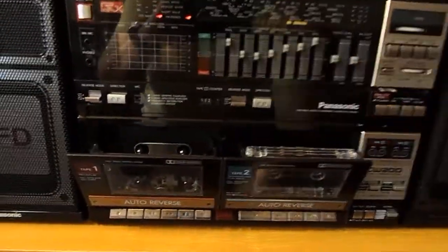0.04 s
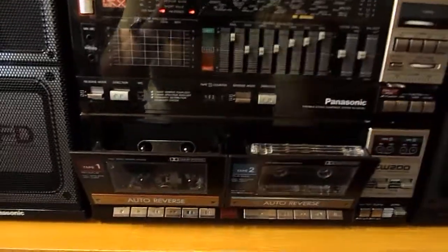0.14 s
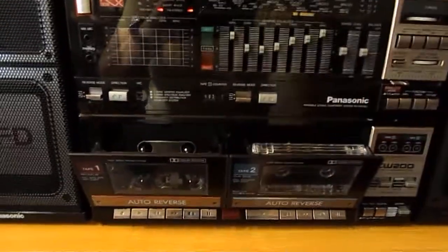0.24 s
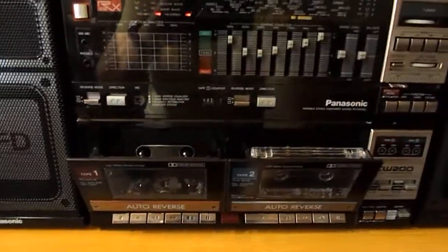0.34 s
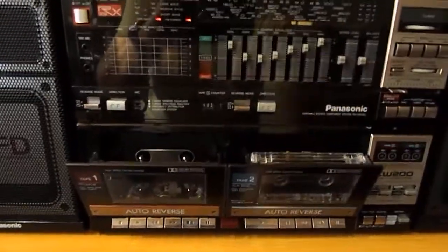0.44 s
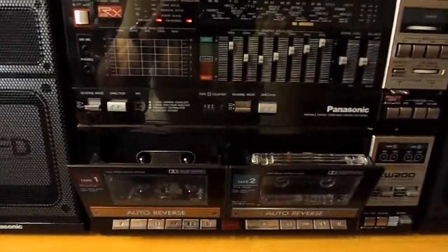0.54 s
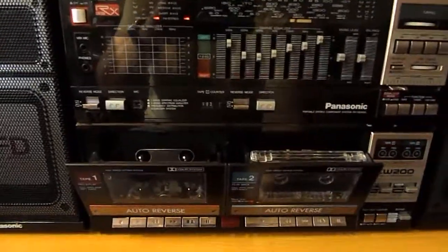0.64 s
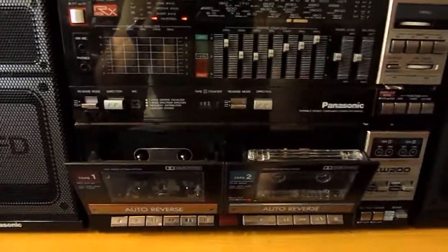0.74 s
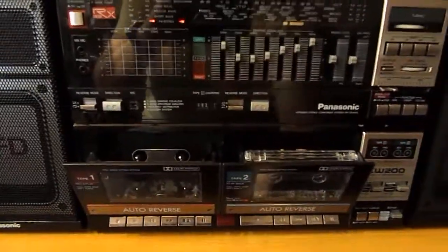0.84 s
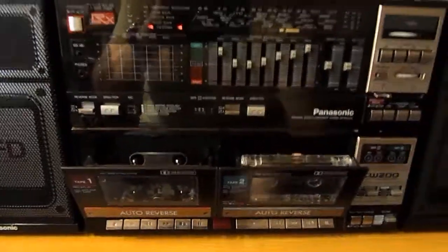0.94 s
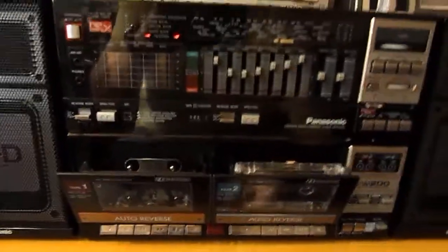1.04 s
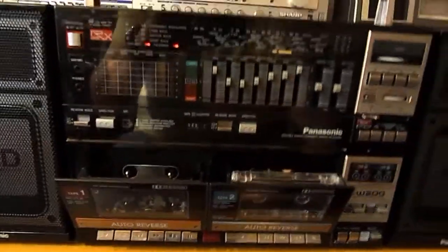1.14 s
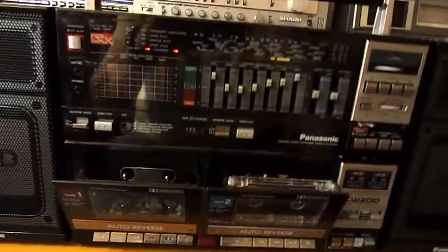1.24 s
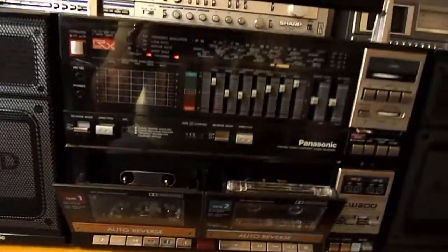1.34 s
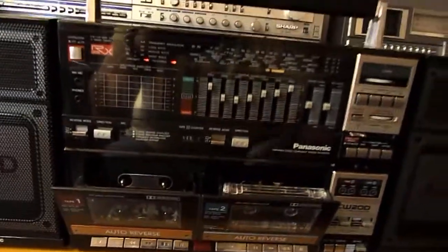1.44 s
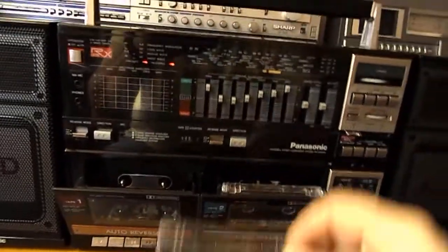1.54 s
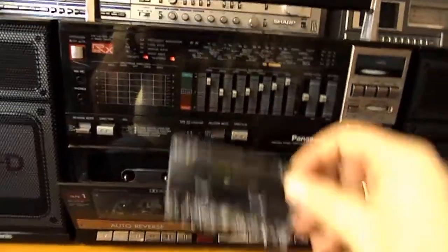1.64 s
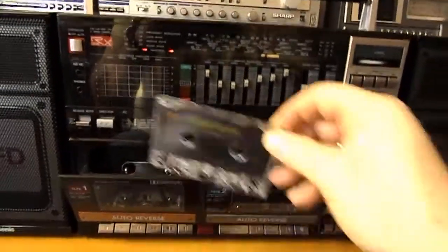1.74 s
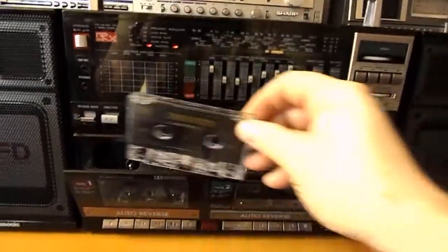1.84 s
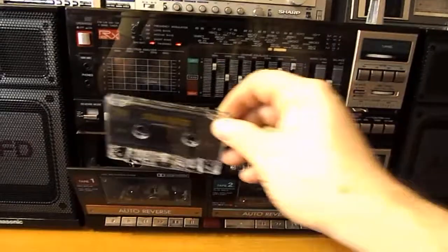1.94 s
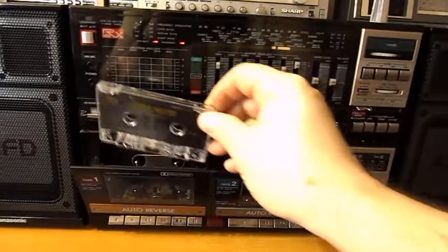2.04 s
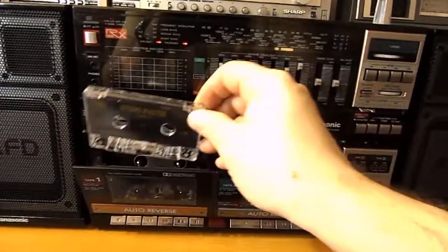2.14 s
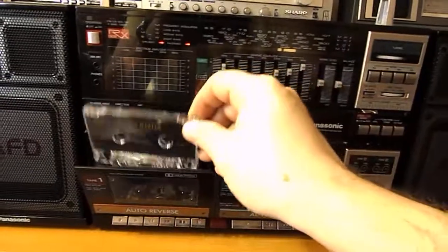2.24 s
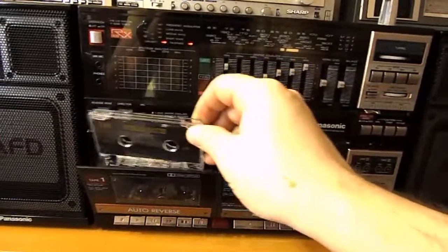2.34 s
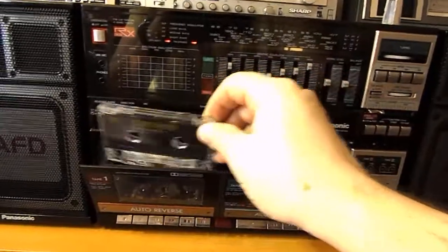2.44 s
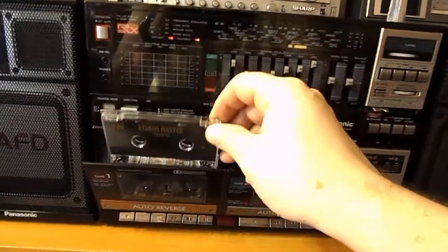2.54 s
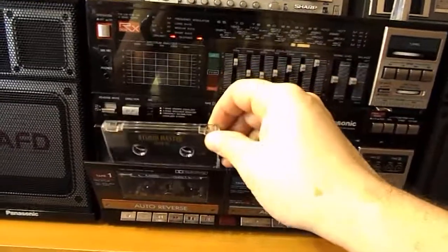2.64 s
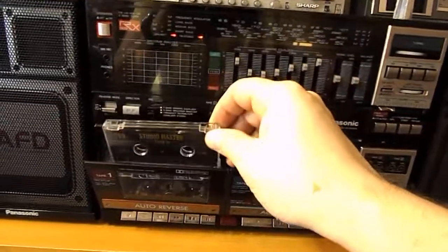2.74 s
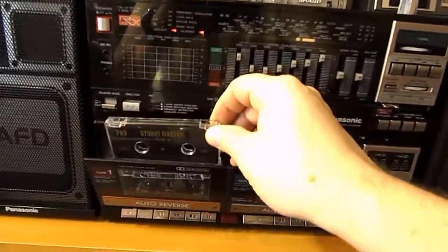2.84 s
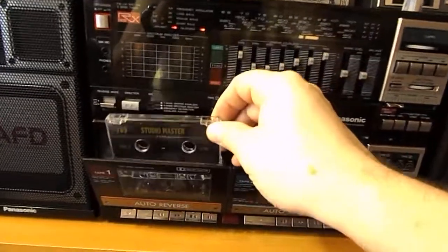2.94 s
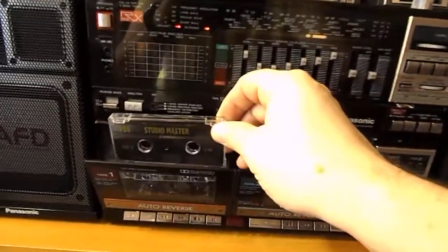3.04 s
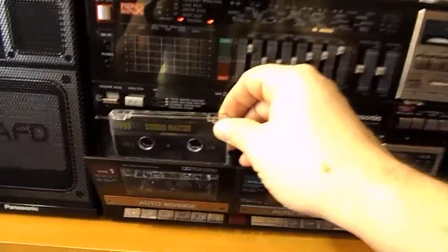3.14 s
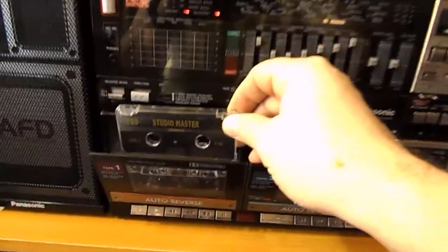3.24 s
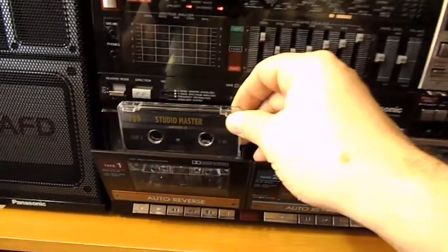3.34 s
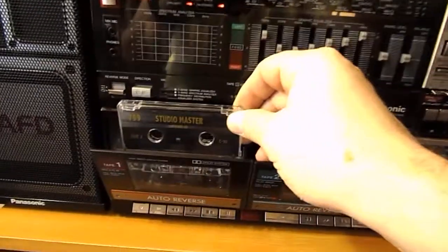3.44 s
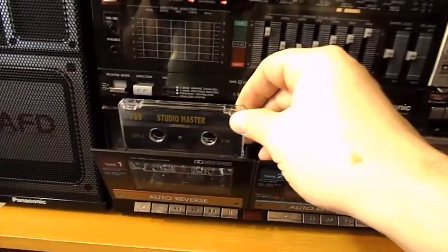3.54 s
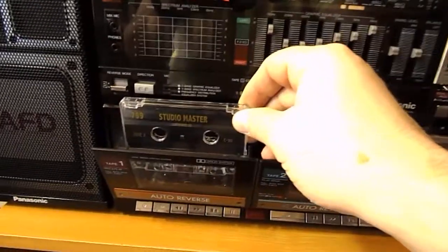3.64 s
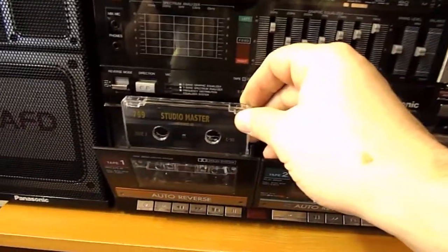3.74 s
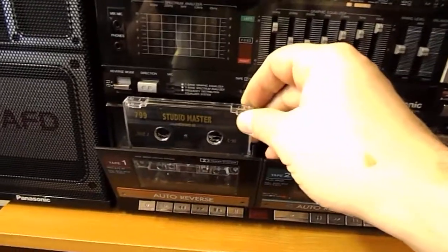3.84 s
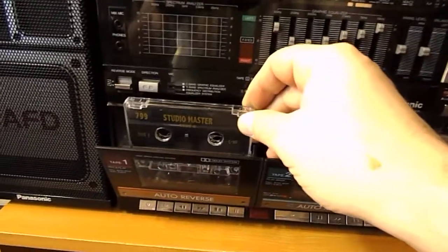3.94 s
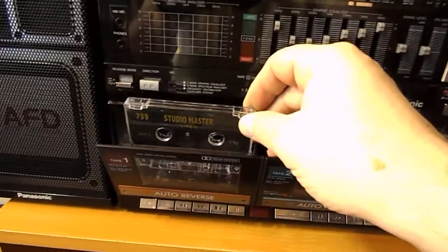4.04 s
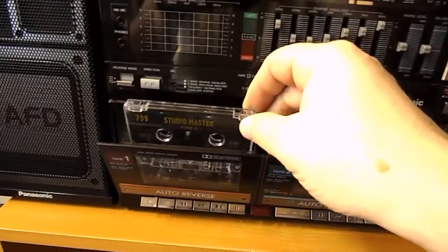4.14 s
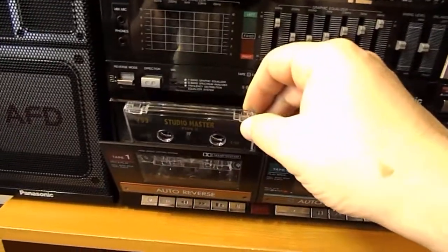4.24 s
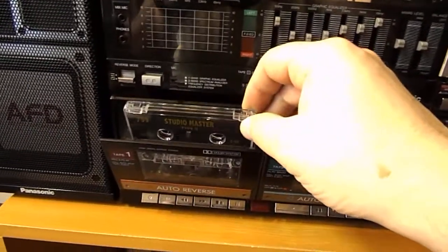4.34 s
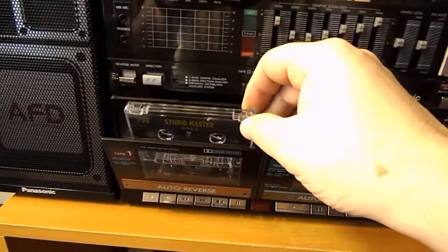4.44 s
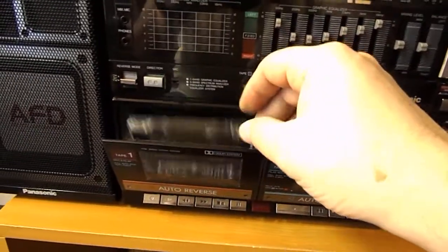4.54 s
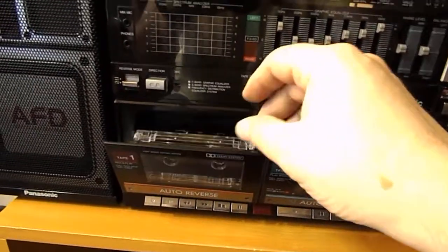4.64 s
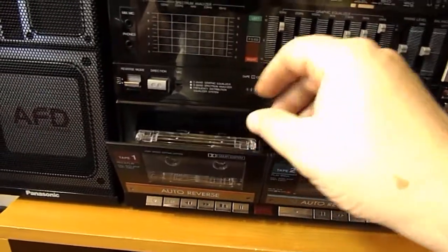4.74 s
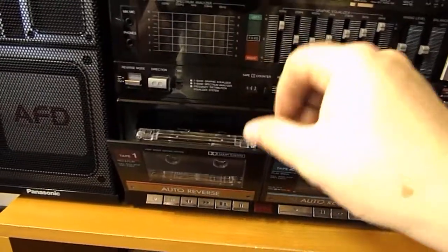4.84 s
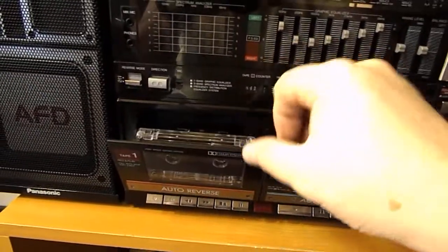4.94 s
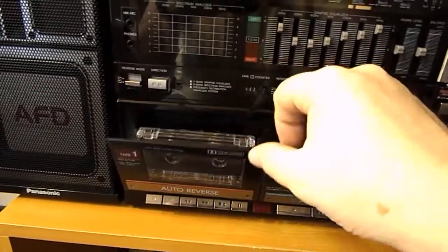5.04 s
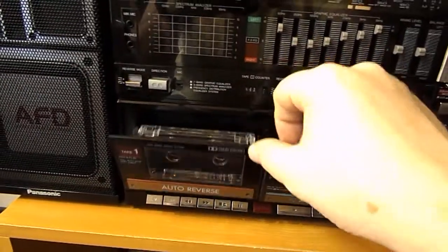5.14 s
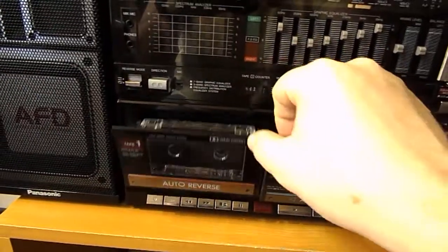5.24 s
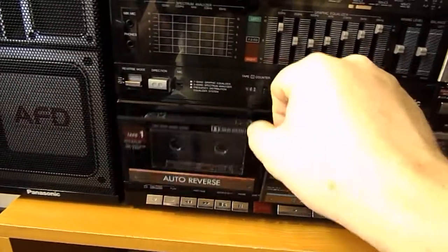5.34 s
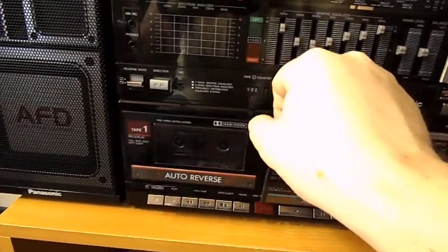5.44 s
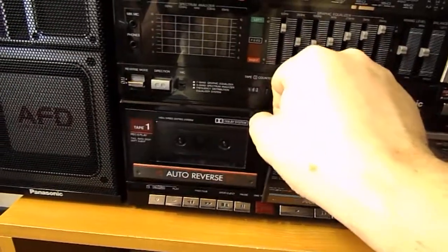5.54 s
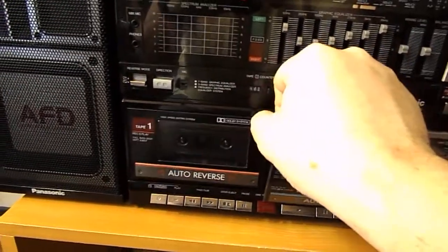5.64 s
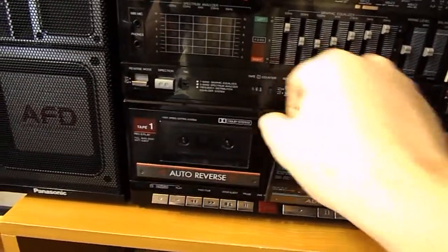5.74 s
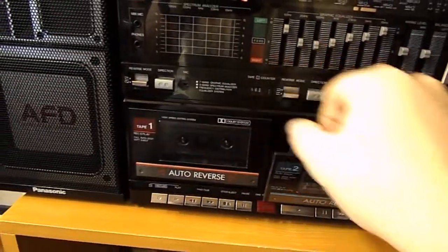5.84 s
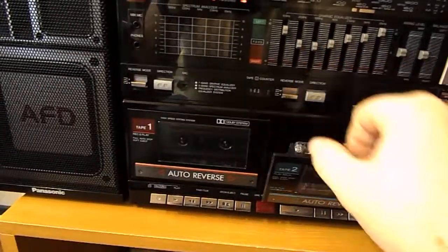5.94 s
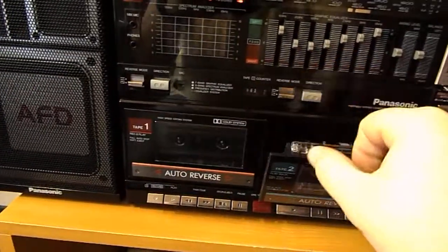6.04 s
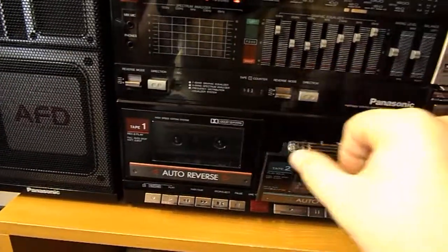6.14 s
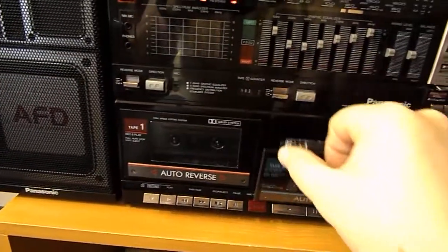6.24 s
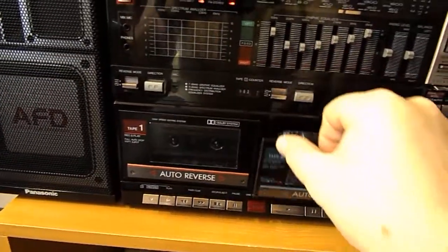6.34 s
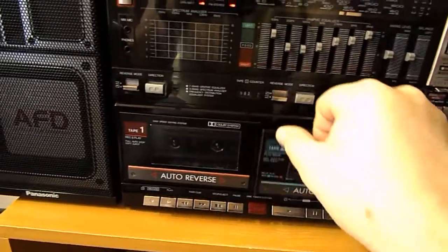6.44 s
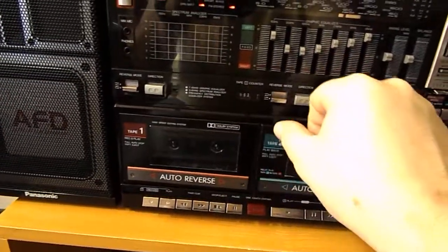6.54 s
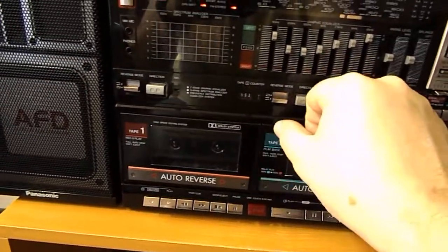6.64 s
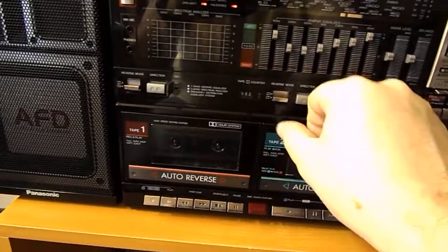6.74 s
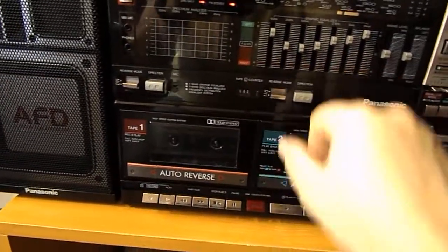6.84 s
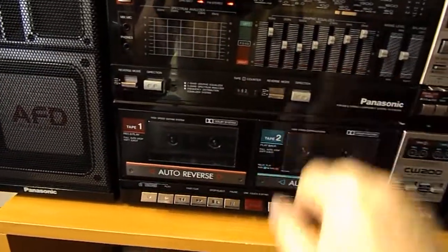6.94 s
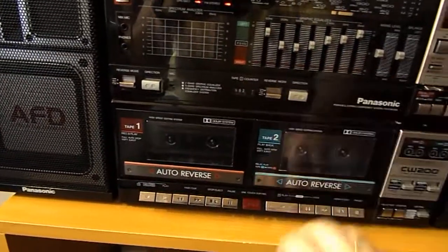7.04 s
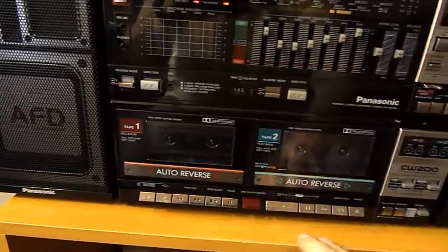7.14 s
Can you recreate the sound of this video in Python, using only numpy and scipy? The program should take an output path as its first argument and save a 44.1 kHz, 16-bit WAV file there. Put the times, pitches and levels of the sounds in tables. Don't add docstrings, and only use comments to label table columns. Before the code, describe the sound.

Plastic cassette doors clack open and snap shut on a portable stereo, with close cassette clicks, small rattles and faint hiss in a small room.

```python
import sys
import numpy as np
from scipy import signal
from scipy.fft import rfft, irfft, next_fast_len
from scipy.io import wavfile
from scipy.ndimage import uniform_filter1d

SR = 44100
rng = np.random.default_rng(int(sys.argv[2]) if len(sys.argv) > 2 else 0)


def digitize_waveform(pressure):
    field = np.atleast_2d(pressure).T
    bounded = np.clip(field, -1, 1)
    quanta = np.round(bounded * 32767).astype(np.int16)
    wavfile.write(sys.argv[1], SR, quanta)


def volts(x):
    e = np.asarray(x, float) / 20
    return 10 ** e


N = 316638
TIME_S = np.arange(N) / SR
RING_S = np.arange(4400) / SR
LEFT_RIGHT = np.array([[1], [-1]])
SCATTER_DB = 2.5
WALL_BLUR, TOP_HZ = 6, 16500


def band(x, lo_hz, hi_hz):
    return signal.sosfilt(signal.butter(2, [lo_hz, hi_hz], "bandpass", fs=SR, output="sos"), x)


def highpass(x, order, hz):
    return signal.sosfilt(signal.butter(order, hz, "highpass", fs=SR, output="sos"), x)


def unit(x):
    return x / np.sqrt(np.mean(x ** 2))


def on_log(table, hz):
    table = np.array(table)
    return np.interp(np.log(hz), np.log(table[:, 0]), table[:, 1])


def add(out, start_s, sound):
    i = int(start_s * SR)
    out[..., i:i + sound.shape[-1]] += sound[..., :N - i]


# freq_hz, density_db_per_hz
HISS = [(70, -37.5), (156, -15.5), (304, -4.5), (484, -5), (565, -8), (1200, -10), (2930, -15.5),
        (16200, -23.5)]
# freq_hz, balance_db
HISS_BALANCE = [(200, 0), (700, 1.5), (1300, 3), (4400, 4), (15000, 2)]
# centre_hz, width_hz, level_db
HUM = [(490.4, 23, -66.5), (1060, 40, -73.5), (1260, 8.1, -75)]
HISS_DB = -54
WHINE_HZ, WHINE_DB = 11719, -77


def background():
    size = next_fast_len(N)
    hz = np.maximum(np.arange(size // 2 + 1) * SR / size, 1)
    lean_db = on_log(HISS_BALANCE, hz) / 2
    colour_db = on_log(HISS, hz) + LEFT_RIGHT * lean_db
    hiss = irfft(rfft(rng.standard_normal((2, size))) * volts(colour_db), size)[:, :N]
    waver = uniform_filter1d(rng.standard_normal(N), size=6000)
    out = unit(hiss) * volts(HISS_DB - 0.5 + 0.5 * unit(waver))
    for centre_hz, width_hz, level_db in HUM:
        noise = rng.standard_normal((2, N))
        mid, side = band(noise, centre_hz - width_hz / 2, centre_hz + width_hz / 2)
        out = out + volts(level_db) * (unit(mid) + 0.6 * unit(side) * LEFT_RIGHT)
    return out + volts(WHINE_DB + 4) * np.sin(2 * np.pi * WHINE_HZ * TIME_S)


# centre_hz, t60_s, level_db
ROOM = [(250, 0.39, -5.5), (500, 0.28, -8), (1000, 0.27, -16.5), (2000, 0.33, -20), (3740, 0.35, -22),
        (8000, 0.26, -20), (13090, 0.23, -22.5)]


def room(dry):
    t = TIME_S[:SR // 2]
    echo = 0
    for hz, t60_s, level_db in ROOM:
        mid, side = band(rng.standard_normal((2, len(t))), hz / 1.365, hz * 1.426)
        pair = mid + min(hz / 1300, 1) * side * LEFT_RIGHT
        echo = echo + volts(level_db - 60 * t / t60_s) * pair
    echo = echo * (1 - np.exp(-t / 0.0013)) * volts(-30 + 1.5 * LEFT_RIGHT)
    return signal.fftconvolve(dry, echo, axes=1)[:, :N]


# freq_hz, share_of_left_lean
SHADOW = [(300, 0.21), (700, .2), (1300, 0.4), (2400, 0.4), (4400, 1), (8000, 0), (15000, 0.61)]


def ring(modes, port_s, pan_db):
    hz, db, t60_s = np.transpose(modes)[:, :, None]
    t = RING_S[:int(t60_s.max() * SR)]
    chance = rng.standard_normal((4, len(modes), 1))
    phase = 2 * np.pi * hz * t + chance[3]
    size = volts(db + SCATTER_DB * chance[0] - 60 * t / t60_s)
    left = size * np.sin(phase)
    shade = volts(SCATTER_DB * chance[1] - pan_db * on_log(SHADOW, hz))
    right = size * shade * np.sin(phase + 2 * np.pi * hz * port_s * chance[2])
    wall_size = np.sqrt(WALL_BLUR) * volts(db - 60 * WALL_BLUR * t / t60_s)
    walls = wall_size * np.sin(phase - chance[3])
    return np.array([left.sum(axis=0), right.sum(axis=0), walls.sum(axis=0)])


# freq_hz, level_db, t60_s
SHELL = [(966.5, -69, 0.059), (1700, -4, 0.016), (2800, -7.5, 0.02), (4500, 3, 0.013), (7350, -2.5, 0.013),
         (8655, -30.5, .01)]


def shell(centre_hz, fall_db, count=48):
    table = np.array(SHELL)
    lowest_hz, highest_hz = table[0, 0], table[-1, 0]
    place = (np.arange(count) + rng.random(count)) / count
    hz = lowest_hz * (highest_hz / lowest_hz) ** place
    db = on_log(table[:, :2], hz) - fall_db * np.abs(np.log2(hz / centre_hz))
    t60_s = np.minimum(on_log(table[:, ::2], hz), 0.036)
    return np.transpose([hz, db, t60_s])


# start_s, rise_ms, fall_ms, peak_db, treble_db (re level)
STROKES = [(.1, 100, 64, -66, 6), (.285, 26, 400, -57.5, 1), (.558, 7, 70, -32.5, -2.5),
           (.833, 8, 47, -38, -5), (.88, 20, 130, -60, 0), (1.03, 47, 50, -52, 3), (2.021, 5, 18, -27, -2),
           (2.04, 13, 28, -36.5, -4), (2.436, 5.3, 34, -30.5, -7.5), (2.498, 16, 50, -30.5, -3),
           (2.557, 10, 26, -32.5, 0), (2.669, 8.2, 45, -45, -8), (4.535, 63, 25, -45.5, 4),
           (4.775, 20, 130, -43, -10), (5.158, 8, 77, -51, 4.5), (5.2, 156, 40, -53, -1.5),
           (5.491, 14, 66, -40, -13.5), (5.948, 10.6, 280, -60.5, 4), (6.426, 8, 16, -54, -1.5),
           (6.452, 21, 8, -47, 2), (6.49, 22, 15, -54, 4), (6.572, 11, 52, -38, -0.5),
           (7.09, 19, 50, -67, 1)]
# start_s, end_s, pitch_hz, width_hz, level_db
SQUEAKS = [(0.864, 0.983, 4400, 260, -60), (1.036, 1.124, 4400, 250, -56.5), (1.053, 1.097, 6170, 500, -78),
           (4.556, 4.634, 1700, 601, -50.5), (4.545, 4.646, 3500, 600, -53.5),
           (4.585, 4.663, 7430, 1288, -44.5), (4.838, 5.0, 1640, 160, -64), (5.2, 5.384, 7240, 1100, -61),
           (6.124, 6.203, 6710, 1229, -58.5), (6.119, 6.209, 3470, 595, -64.5),
           (7.092, 7.159, 3160, 300, -64.5)]
STROKE_START_DB, STROKE_END_DB = -14, -15


def sliding():
    slips = rng.standard_normal(N) * volts(2.2 * rng.exponential(size=N))
    shaken = signal.fftconvolve(slips, ring(shell(2500, fall_db=5), 0, 0)[2])[:N]
    body = unit(band(shaken, 700, 3300))
    treble = unit(band(unit(shaken) + 0.2 * unit(slips), 3200, 13000))
    out = np.zeros(N)
    for start_s, rise_ms, fall_ms, peak_db, treble_db in STROKES:
        knots_s = start_s + np.cumsum([0, rise_ms, fall_ms]) / 1000
        knots_db = peak_db + np.array([STROKE_START_DB, 0, STROKE_END_DB])
        span = slice(int(knots_s[0] * SR), int(knots_s[-1] * SR))
        t = TIME_S[span]
        fade = np.clip(np.minimum(t - knots_s[0], knots_s[-1] - t) / 0.0039, 0, 1)
        level = fade * volts(np.interp(t, knots_s, knots_db) - 3.5)
        out[span] += level * (body[span] + volts(treble_db) * treble[span])
    for start_s, end_s, hz, width_hz, level_db in SQUEAKS:
        span = slice(int(start_s * SR), int(end_s * SR))
        whistle = band(slips[span], hz - width_hz / 2, hz + width_hz / 2)
        out[span] += volts(level_db) * unit(whistle) * np.sqrt(np.hanning(len(whistle)))
    return out * volts([[3], [-4], [3]])


# start_s, peak_db, pitch_hz, t60_s
PANELS = [(0.6384, -3, 3640, 0.026), (4.6543, 1.5, 1775, 0.034), (4.6445, -12, 5750, .03),
          (4.664, -11.5, 2265, 0.074), (5.48, -27, 705, 0.07), (2.671, -26, 1780, 0.05),
          (4.6614, -5.5, 1820, 0.05), (5.4789, -14, 4340, 0.029), (5.5952, -11, 1820, 0.1),
          (6.567, -17, 2430, 0.029), (6.6308, -9, 1910, 0.037), (6.6454, -10, 2020, 0.04),
          (.641, -29, 313, 0.079), (.642, -19.5, 763, 0.1), (4.655, -20, 683, .08),
          (4.658, -17, 524, 0.088)]


def door_panels():
    out = np.zeros((3, N))
    for start_s, peak_db, hz, t60_s in PANELS:
        t60_s = min(t60_s, 0.09)
        pair = [(hz, 0, t60_s), (hz * 0.93, -6, t60_s)]
        panel = ring(pair, 2e-5, pan_db=10)
        rise = 1 - np.exp(-RING_S[:panel.shape[1]] / 0.0005)
        gain = volts(peak_db - 1.5 + np.array([[0], [0], [-6]]))
        add(out, start_s, gain * panel * rise)
    return out


# start_s, peak_db, pitch_hz
PINGS = [
    (4.6434, -6, 10100),
    (5.4624, -50.5, 9990),
    (5.5846, -35, 9960),
]


def latch_pings():
    out = np.zeros((3, N))
    for start_s, peak_db, hz in PINGS:
        add(out, start_s, volts(peak_db - 3.5) * ring([(hz, 0, 0.025)], 1e-5, pan_db=5))
    return out


# pitch_hz, t60_s
SPRING = [(9250, 0.02), (11530, 0.047), (14100, .06)]
# start_s, peak_db, lower_tone_db, upper_tone_db (tones re peak)
TWANGS = [(0.83, -41, 4, -9.5), (2.0594, -41, -12.5, -8.5), (2.3111, -30, -6, -4), (2.4339, -44, -19, -7),
          (2.549, -33, -22.5, -9.5), (2.5995, -24.5, -17.5, -10), (4.6694, -33.5, -14, -2)]


def spring_twangs():
    out = np.zeros((3, N))
    for start_s, peak_db, low_db, high_db in TWANGS:
        tones = [(hz, db, t60_s) for (hz, t60_s), db in zip(SPRING, (low_db, 0, high_db))]
        twang = ring(tones, 1e-5, pan_db=7.5)
        rise = 1 - np.exp(-RING_S[:twang.shape[1]] / 0.001)
        add(out, start_s, volts(peak_db - 0.5) * twang * rise)
    return out


# freq_hz, level_db, t60_s
CABINET = [(295.6, -11, 0.28), (327.5, -6, 0.32), (449.6, 7.5, 0.14), (500, -14.5, 0.037), (670, -5, 0.14),
           (749, 19.5, 0.06), (920, 14.5, 0.063)]
SHELL_LOW_HZ = 650


def knock(hz, cabinet_db, crack_db, chatter_ms, pan_db):
    t = RING_S[:1200]
    slips = rng.standard_normal(len(t)) * (rng.random(len(t)) < 0.2)
    chatter = slips * np.exp(-(t * 1000 / chatter_ms) ** 1.1)
    chatter[0] = 1.83
    blow = np.sqrt(np.sum(chatter ** 2)) * (t == 0)
    fade_db = -60 * RING_S[:900] / 0.0021 * np.array([[1], [1], [WALL_BLUR]])
    crack = rng.standard_normal((3, 900)) * volts(fade_db + np.array([[0], [-0.65 * pan_db], [7]]))
    t60_scale = np.clip(chatter_ms / 2.22, 0.3, 1.6)
    modes = np.vstack([shell(hz, fall_db=6), (hz, 3, 0.018)]) * [1, 1, t60_scale]
    parts = [(0, band(ring(modes, 3e-5, pan_db), SHELL_LOW_HZ, TOP_HZ)),
             (cabinet_db - 5.5, ring(CABINET, 5e-5, pan_db)),
             (crack_db + 6.5, band(crack, 4500, TOP_HZ))]
    out = np.zeros((3, len(RING_S) + len(t)))
    for db, part in parts:
        part = signal.fftconvolve(part, np.array([chatter, chatter, blow]), axes=1)
        add(out, 0, volts(db) * part / np.max(np.abs(part[:2].mean(axis=0))))
    return out


# time_s, treble_left_minus_right_db
AIM = [(0, 17.5), (.64, 18), (1.7, 14.5), (2.0, 20), (2.6, 8), (3.4, 13), (4.6, 12.5), (5.6, 12),
       (6.48, 12.5), (6.63, 12), (7.18, 15.5)]
CLOSE_SPAN_S, CLOSE_ROOM_DB = (1.7, 1.8), -24


def strike(out, start_s, peak_db, hz, cabinet_db, crack_db, chatter_ms):
    pan_db = np.interp(start_s, *np.transpose(AIM))
    room_db = CLOSE_ROOM_DB * (CLOSE_SPAN_S[0] < start_s < CLOSE_SPAN_S[1])
    gain = volts(peak_db + np.array([[0], [0], [room_db]]))
    add(out, start_s, gain * knock(hz, cabinet_db, crack_db, chatter_ms, pan_db))


# start_s, peak_db, loudest_ring_hz, crack_db (re peak)
BUMPS = [(0.293, -36, 910, -38), (0.8318, -29.5, 4600, -7), (1.0296, -41.5, 2000, -26.5),
         (2.0274, -27, 4730, -10), (2.0454, -30.5, 4810, -6), (3.7894, -48.5, 1046, -25),
         (4.0577, -37.5, 1670, -34), (5.1198, -43.5, 1060, -17.5), (5.3348, -40, 1430, -17),
         (5.7464, -35, 1830, -26), (6.5954, -27, 1095, -20)]


def bumps():
    out = np.zeros((3, N))
    for start_s, peak_db, hz, crack_db in BUMPS:
        strike(out, start_s, peak_db, hz, cabinet_db=1, crack_db=crack_db, chatter_ms=3)
    return out


# start_s, peak_db, loudest_ring_hz, crack_db (re peak)
TAPS = [(0.5232, -40.5, 1940, -10), (0.822, -27, 3260, -21.5), (1.1624, -49, 7220, 0.5),
        (2.0574, -25.5, 1025, -34.5), (2.292, -21, 2150, -23), (2.3246, -23, 1270, -12),
        (2.4345, -24.5, 5000, -10), (2.438, -21.5, 900, -23), (2.5134, -25.5, 2214, -14),
        (2.9201, -25.5, 3120, -17), (2.9654, -39, 1880, -24), (3.0844, -41, 6150, -18),
        (3.1393, -35.5, 5780, -22), (3.3403, -41.5, 2110, -24), (3.3687, -30.5, 1750, -35),
        (4.5231, -41.5, 3610, -15.5), (5.2954, -39, 1750, -23), (5.3862, -20.5, 3600, -29.5),
        (5.479, -19.5, 3640, -26.5), (5.9564, -38.5, 3546, -14), (6.4457, -39.5, 2587, -11),
        (6.7875, -28.5, 2380, -30), (7.104, -49.5, 3150, -15.5)]


def taps():
    out = np.zeros((3, N))
    for start_s, peak_db, hz, crack_db in TAPS:
        strike(out, start_s, peak_db, hz, cabinet_db=-6, crack_db=crack_db, chatter_ms=3.32)
    return out


# start_s, peak_db, loudest_ring_hz, crack_db (re peak)
SLAMS = [(0.5599, -22.5, 1790, -13), (0.638, -2, 3300, -13), (0.7564, -29, 2500, -20),
         (2.7576, -33.5, 2000, -29), (3.0535, -37.5, 2386, -25), (4.5443, -41.5, 1770, -12),
         (4.572, -34, 1700, -5), (4.6425, -0.5, 5000, -18), (4.6452, -4.5, 5820, -7),
         (4.7194, -19.5, 5700, -3.5), (5.1615, -39, 3420, -9.5), (5.4544, -31.5, 1300, -18.5),
         (5.4645, -21, 4410, -36), (5.5947, -2, 4720, -13), (6.1452, -44.5, 3430, -10.5),
         (6.1699, -44, 3400, -23.5), (6.5445, -25, 1820, -29.5), (6.5612, -18, 6930, -25.5),
         (6.631, -3.5, 3160, -11.5)]


def slams():
    out = np.zeros((3, N))
    for start_s, peak_db, hz, crack_db in SLAMS:
        strike(out, start_s, peak_db, hz, cabinet_db=-13.5, crack_db=crack_db, chatter_ms=3.86)
    return out


# start_s, peak_db, loudest_ring_hz, crack_db (re peak), chatter_ms
SNAPS = [(0.5538, -23.5, 2150, -14, 4.3), (1.7293, -9, 3330, -19, 0.92), (1.7694, -28.5, 2516, -34, 1.6),
         (2.0198, -18.5, 1340, -44, 2.9), (2.3059, -8, 3090, -30, 1.75), (2.3105, -18.5, 4260, -3.5, 3.1),
         (2.5491, -12, 984, -4.5, 4.2), (2.6, -5, 4980, -15, 2.8), (2.6694, -11, 3340, -12, 2.9),
         (3.0085, -46.5, 4410, -19, 3.8), (4.6125, -26, 4720, 1, 3.5), (4.624, -29, 1870, -5.5, 13),
         (4.6547, 2, 1750, -18.5, 2.27), (4.6631, -0.5, 1876, -18, 3.2), (5.5, -23.5, 2200, -23, 3.5),
         (5.5884, -26, 7960, 2.5, 1.1), (5.6093, -4.5, 3050, -11, 5.2), (6.478, -27, 6270, -5.5, 4.3),
         (6.567, -16.5, 2370, -23, 6.1), (6.6452, 2, 2050, -16, 1.9)]


def snaps():
    out = np.zeros((3, N))
    for start_s, peak_db, hz, crack_db, chatter_ms in SNAPS:
        strike(out, start_s, peak_db, hz, -41.5, crack_db, chatter_ms)
    return out


def scene():
    ringing = door_panels() + latch_pings() + spring_twangs()
    knocks = bumps() + taps() + slams() + snaps()
    near = sliding() + ringing + knocks
    heard = near[:2] + room(near[2:])
    return highpass(heard, 6, 270) + background()


def roll_off(x):
    return signal.sosfilt(signal.butter(12, 16360, fs=SR, output="sos"), x)


OVERLOAD = 0.92


def record(dry):
    thin = highpass(np.clip(dry, -OVERLOAD, OVERLOAD), 4, 135)
    thin = signal.sosfilt(signal.ellip(6, 0.2, 30, 15900, fs=SR, output="sos"), thin)
    return roll_off(thin)


dry = scene()
out = record(dry)
digitize_waveform(out)
```